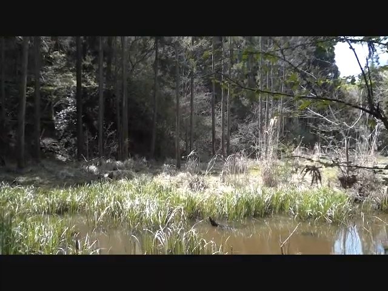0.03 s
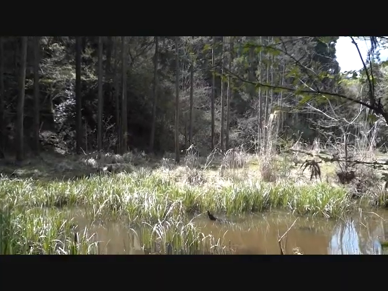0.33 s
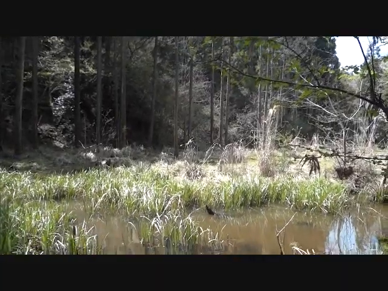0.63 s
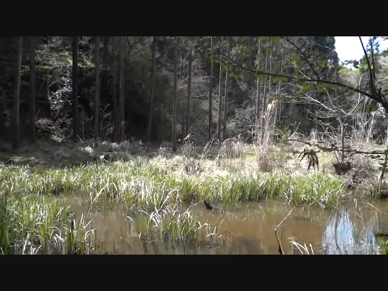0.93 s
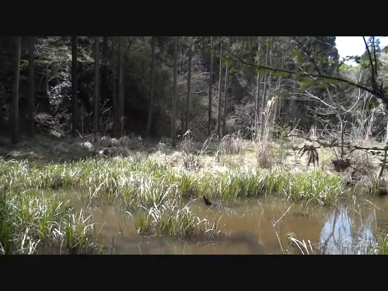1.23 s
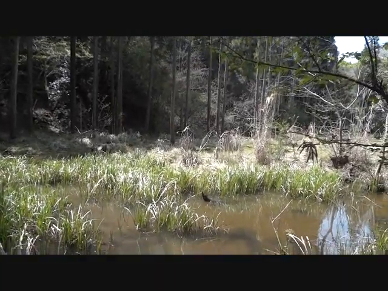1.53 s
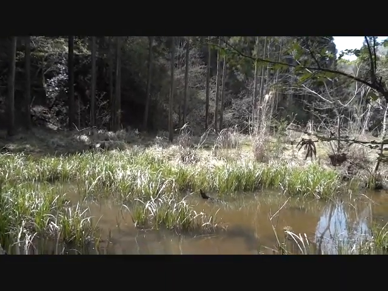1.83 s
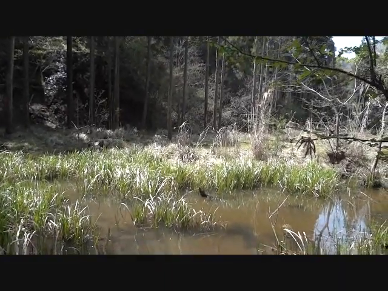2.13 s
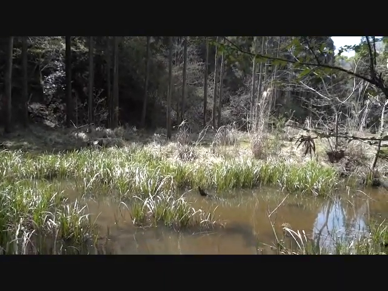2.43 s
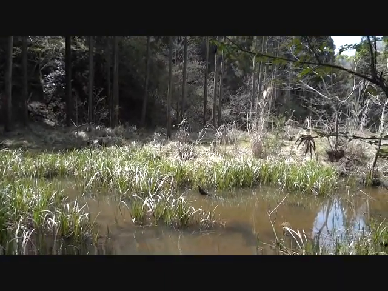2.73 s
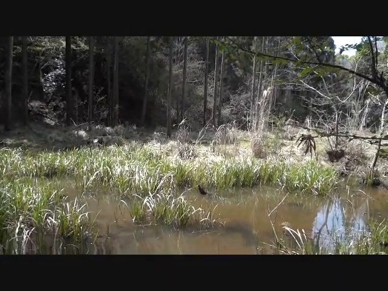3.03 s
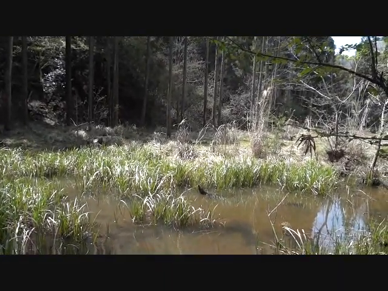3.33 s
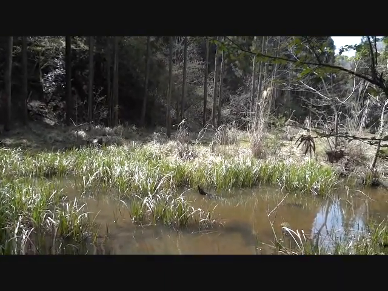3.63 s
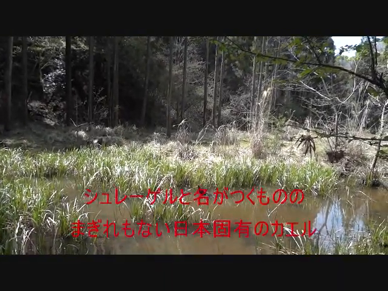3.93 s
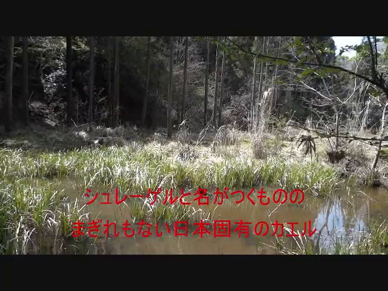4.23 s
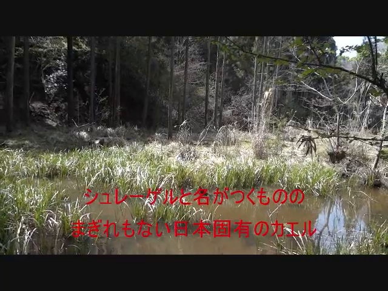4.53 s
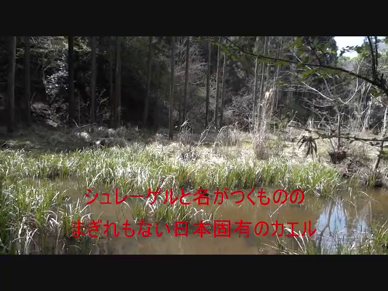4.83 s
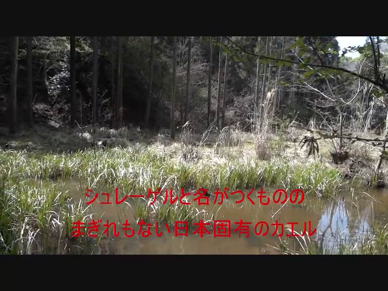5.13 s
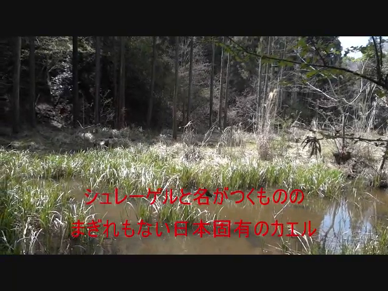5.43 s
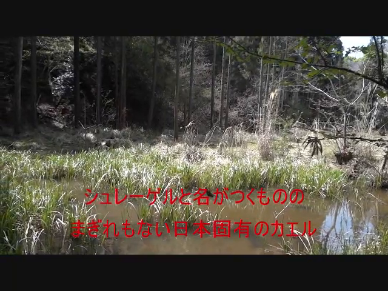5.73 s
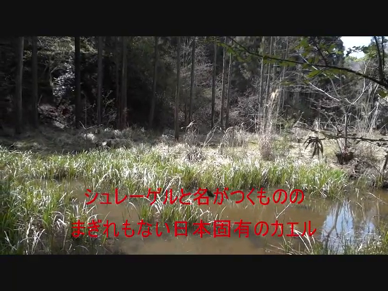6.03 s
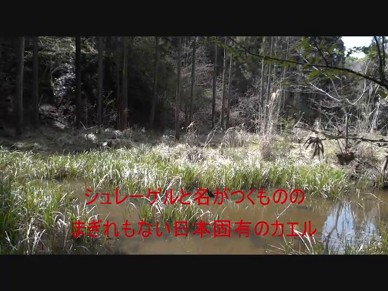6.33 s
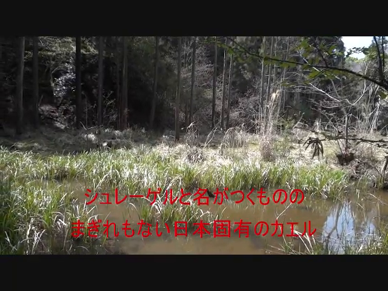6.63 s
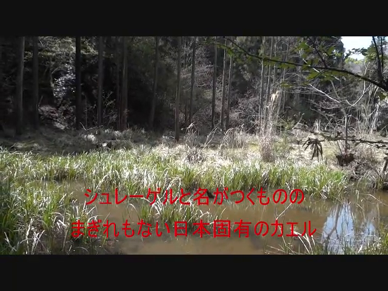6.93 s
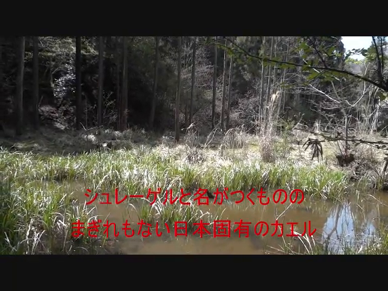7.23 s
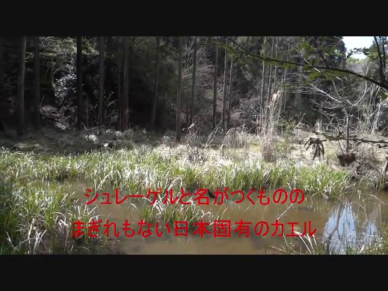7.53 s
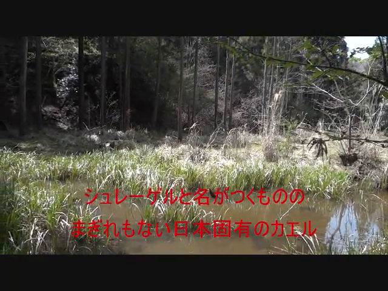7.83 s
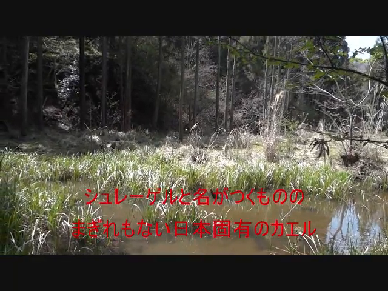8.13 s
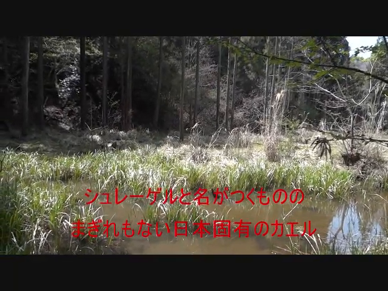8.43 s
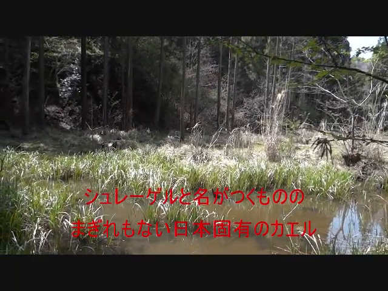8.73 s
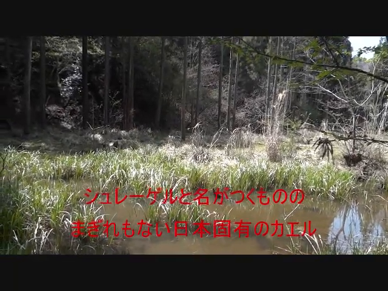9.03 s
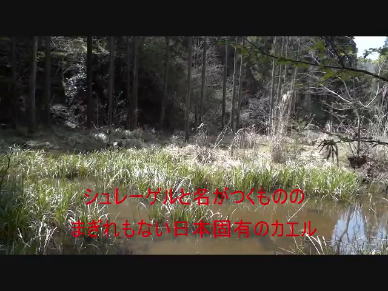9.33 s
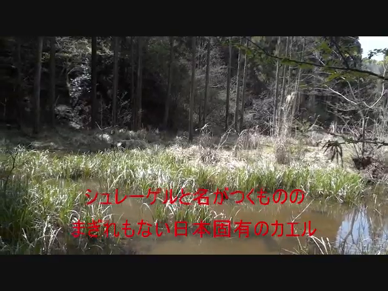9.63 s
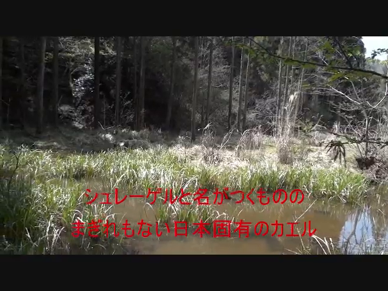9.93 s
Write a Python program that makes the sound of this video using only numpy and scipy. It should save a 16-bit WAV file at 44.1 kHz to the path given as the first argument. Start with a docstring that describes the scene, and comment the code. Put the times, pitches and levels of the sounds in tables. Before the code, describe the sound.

Several frogs trade quick, high, pulsing trills around a pond, some close and some distant, over a soft forest hush.

```python
"""A marshy pond at the edge of a wood, heard from the bank on a camera's stereo microphone.
Tree frogs trill in turns, from close by to far off. Each note is a few quick pulses of the larynx
that ring the vocal sac; reeds and trunks scatter it back. Under them lie one far bird, a few close
ticks and soft forest air, with the camera's own hiss, whine and lens motor right at the microphone."""
import sys
import numpy as np
from scipy import signal
from scipy.fft import rfft, irfft, next_fast_len
from scipy.io import wavfile

SR = 44100
rng = np.random.default_rng(int(sys.argv[2]) if len(sys.argv) > 2 else 0)


def inscribe(sig):
    """Save sig as 16-bit PCM at rate SR to the path in sys.argv[1].

    A 1-D sig is mono; a 2-D sig holds one channel per row.
    Samples are clipped to [-1, 1] before scaling.
    """
    pcm = np.round(np.clip(np.atleast_2d(sig).T, -1, 1) * 32767)
    wavfile.write(sys.argv[1], SR, pcm.astype(np.int16))


N = 440118

# Trills round the pond; a close_gap_ms of 0 means no closing note: start_s, note_count, first_gap_ms,
# slowing_ms (per note), close_gap_ms, level_db (before the frog's trim), swell_db, fade_db, pitch_hz, frog
FROG_TRILLS = [(0.0128, 2, 84.4, 0, 0, -13.5, 0, 1.5, 1985, "near"),
               (1.9648, 7, 79.8, 2.7, 50, -11.2, 12, 1.2, 1975, "near"),
               (6.7472, 4, 73.1, 6.2, 68, -11.8, 18.5, 0, 1994, "near"),
               (8.6308, 5, 83.2, 1.2, 66, -11.2, 11.5, 0, 1964, "near"),
               (0.6794, 6, 78.2, 2.1, 52, -16.8, 5, 1.3, 1862, "hoarse"),
               (3.7497, 5, 73.6, 5.6, 55, -17.5, 5.5, 0, 1880, "hoarse"),
               (1.4059, 5, 56.7, 3.2, 51, -16.2, 12, 2.5, 2045, "clear"),
               (3.8057, 4, 59.1, 4.5, 51, -15.3, 8, 0, 2030, "clear"),
               (5.2340, 4, 57.2, 2.3, 54, -19.3, 10.5, 0, 2040, "clear"),
               (0.5940, 5, 69, 0, 0, -27, 4, 0, 2100, "reeds"),
               (2.8204, 4, 54.8, 5.5, 0, -23, 14, 0, 2070, "reeds"),
               (4.3997, 5, 54.4, 3.4, 41, -25.5, 8, 4.5, 2085, "reeds"),
               (6.1650, 5, 64, 0, 0, -23.3, 7.5, 6.5, 2095, "reeds"),
               (8.0877, 5, 54.6, 4.3, 0, -25.5, 9, 5.5, 2120, "reeds"),
               (2.9078, 16, 46.9, 0.24, 57, -16.2, 12, 7, 1745, "deep"),
               (1.6600, 4, 60, 4, 0, -38, 0, 2, 1760, "deep"),
               (8.1750, 5, 48, 0, 24, -37, 8, 0, 1800, "deep"),
               (0.5544, 5, 33, 5, 48, -23.2, 5.5, 1.5, 2030, "far"),
               (1.4474, 5, 43, 0, 34, -22, 4.5, 1, 2055, "far"),
               (2.9570, 6, 43, 2.2, 48, -20.5, 8, 4.5, 2020, "far"),
               (6.2044, 2, 47, 0, 66, -24, 0, 2, 2050, "far"),
               (7.5657, 5, 38.5, 7.8, 0, -21, 8, 7, 2035, "far"),
               (8.5484, 5, 31, 11, 36, -21.5, 6, 2.5, 2020, "far"),
               (9.4434, 5, 46, 1.5, 31, -21.5, 3, 1.5, 2015, "far"),
               (0.1870, 4, 60.5, 0, 0, -31, 4, 13, 1975, "faint"),
               (0.4930, 1, 0, 0, 0, -38.5, 0, 0, 1920, "faint"),
               (1.7785, 4, 43, 1.5, 0, -34.5, 5, 0, 1880, "faint"),
               (4.2543, 2, 81, 0, 0, -42.5, 1, 0, 1885, "faint"),
               (4.7296, 1, 0, 0, 0, -39, 0, 0, 1937, "faint"),
               (5.8795, 4, 74.5, 2, 0, -35.5, 13, 0, 1945, "faint"),
               (7.2659, 6, 48, 1, 0, -43, 3, 0, 1915, "faint"),
               (9.4017, 1, 0, 0, 0, -41, 0, 0, 1785, "faint")]
# Single clucks of the deep frog: start_s, level_db (before the frog's trim), pitch_hz
DEEP_CLUCKS = [(0.1173, -24.5, 1840), (2.086, -29.5, 1720)]
# Resonances of each frog's throat and sac: pitch_multiple, ring_ms, relative_db
NEAR_MODES = [(1, 2.294, 3.5), (.87, 1.8, -19.5), (1.1, 4.55, -27.5), (.66, 1.6, -27), (2.17, 1.24, -35)]
HOARSE_MODES = [(1.025, 1.62, 21.5), (1.075, 1, 10), (0.29, 1.8, -37), (1.276, 0.67, -24), (6.1, .8, -45)]
CLEAR_MODES = [(1, 2.06, 3.5), (0.864, 0.9, -18), (0.92, 1.5, -7.5), (1.85, 1.1, -29)]
DEEP_MODES = [(1.002, 1.34, 10), (.752, 1.8, 4.5), (1.149, 1.35, 5), (1.31, 0.79, -21.5),
              (1.76, 2.1, -27.5), (2.48, 1.3, -31)]
REEDS_MODES = [(0.97, 2.26, 0), (0.844, 1.8, -13), (1.8, 1.3, -27.5)]
FAR_MODES = [(1, 1.87, 15.5), (0.878, 2.3, -16), (0.84, 4.2, -13), (1.2, 4.9, -11), (1, 1.8, -21),
             (2.1, 1.9, -21.5)]
FAINT_MODES = [(0.988, 2.224, -1.5), (1.136, 2.0, -10.5)]
# Where each frog sits, seen from the microphone: frog, left_minus_right_db
FROG_PAN_DB = dict(near=3.1, hoarse=1.7, clear=3.9, deep=3.3, reeds=1.6, far=1.6, faint=1.2)
# So small a body radiates hardly any bass: frequency_hz, gain_db
BODY_RADIATION = [(700, -44), (1030, -21.5), (1200, 0)]
# Colour of what the reeds scatter back: frequency_hz, gain_db
REED_SCATTER = [(1000, -1), (1270, -3), (1500, -0.5), (1720, 4), (1950, -1.5), (2150, -3.5), (2520, 4.5),
                (2700, -3.5), (3600, 0), (4300, 3.5)]
# Whistles of the far bird: start_s, length_s, from_hz, to_hz, level_db
BIRD_WHISTLES = [(0.197, 0.04, 4570, 4630, -68), (6.07, 0.12, 4420, 4500, -76),
                 (6.791, 0.22, 4250, 4450, -67), (6.957, 0.12, 4400, 4410, -62),
                 (7.77, .09, 4000, 4600, -71)]
# Small dry ticks close by: start_s, level_db, pitch_hz
CLOSE_TICKS = [(3.9977, -48, 5430), (9.4608, -46, 5640), (9.5056, -49, 7700)]
# Spans in which the lens motor runs: start_s, end_s
FOCUS_SPANS = [(0, 2.48), (7.85, 13)]
# Steady tones of the camera's electronics: pitch_hz, level_db
WHINE_TONES = [(13486, -85.5), (6773, -91), (13906, -85)]
# Spectrum of forest air and microphone hiss: frequency_hz, relative_db
AIR_SPECTRUM = [(15, -59), (25, -15.5), (102, -7.5), (148, -7), (211, -7), (361, -4.5), (392, -5),
                (437, -4.5), (620, -3.5), (955, -3.5), (1180, -3.5), (1780, -4), (2660, -6.5), (3130, -9),
                (15800, -17)]
# Stereo width of that hush: frequency_hz, side_minus_mid_db
AIR_SPREAD = [(60, -8), (110, -4.5), (200, 0), (380, 4), (700, 6), (1290, 6), (2380, 1.5), (4400, -2.5),
              (8120, -6), (15000, -22.5)]


def frog(notes, modes, pan_db, gap_ms, pulse_db, trim_db, wet_db, trunks_db, jitter, sag=0.014):
    """One frog on the pond: the larynx fires a few pulses a note into the sac, nearly in step with it."""
    track, t = np.zeros(N), seconds(.04)
    pulse = np.arange(len(pulse_db))
    for start, db, hz in notes:
        timing_draw, size_draw = rng.standard_normal((2, len(pulse)))
        gap_s = np.round(gap_ms * hz / 1000) / hz  # a whole number of the sac's swings
        onsets = gap_s * (pulse + jitter * timing_draw * (pulse > 0))
        sizes = undb(np.array(pulse_db) + size_draw)
        pitches = hz * (1 - sag * (pulse - pulse.mean()))  # the pitch sags as the push fades
        note = sum(size * undb(mode_db) * ring(t - onset, pitch * multiple, ring_ms)
                   for onset, size, pitch in zip(onsets, sizes, pitches)
                   for multiple, ring_ms, mode_db in modes)
        add(track, start, note * undb(db + trim_db) / np.abs(note).max())
    return place(track, pan_db) + place(woods(track, wet_db, trunks_db), pan_db=1.1)


def ring(t, hz, ring_ms):
    """A resonance of the sac swells softly for ring_ms after a pulse and dies away."""
    t = np.maximum(t, 0)
    age = t * 1000 / ring_ms
    swell = (age * np.exp(1 - age)) ** 3
    return swell * np.sin(2 * np.pi * hz * t)


def trills(name, rise_notes, hz_per_db, close_db=-4, close_drop_hz=10, stutter_db=-20, waver=0.004):
    """One frog's notes as start_s, level_db, pitch_hz: trills swell, slow and fade; pitch follows effort."""
    fade_power, scatter_db, stutter_s = 4.5, 0.4, 0.0132
    notes = []
    for start, count, gap_ms, slowing_ms, close_ms, db, swell_db, fade_db, hz, caller in FROG_TRILLS:
        if caller != name:
            continue
        k = np.arange(round(count))
        times = start + (gap_ms * k + slowing_ms * k * (k - 1) / 2) / 1000
        fading = (k / max(k[-1], 1)) ** fade_power  # gives way only near the end
        effort_db = -swell_db * np.exp(-k / rise_notes) - fade_db * fading
        level_draw, pitch_draw = rng.standard_normal((len(k), 2)).T
        pitches = (hz + hz_per_db * effort_db) * (1 + waver * pitch_draw)
        notes += zip(times, db + effort_db + scatter_db * level_draw, pitches)
        if close_ms > 0:  # a lower closing note that stutters out
            close_s = times[-1] + close_ms / 1000
            last_db = db + effort_db[-1] + close_db
            last_hz = pitches[-1] - close_drop_hz
            notes += [(close_s + beat * stutter_s, last_db + beat * stutter_db, last_hz)
                      for beat in range(2)]
    return notes


def chorus(lag_s=.00005):
    """Seven frogs, near to far: the further from the bank, the more of the call comes off the wood."""
    near = trills("near", rise_notes=0.95, hz_per_db=13, close_db=-2.2, close_drop_hz=45, stutter_db=-24)
    hoarse = trills("hoarse", rise_notes=1.5, hz_per_db=10, close_db=-1, close_drop_hz=115,
                    stutter_db=-10, waver=0.01)
    clear = trills("clear", rise_notes=1.6, hz_per_db=10, close_db=-2.8, close_drop_hz=30)
    deep = trills("deep", rise_notes=1.1, hz_per_db=3, close_db=-12, close_drop_hz=20, waver=0.022)
    reeds = trills("reeds", rise_notes=1.3, hz_per_db=9, close_db=-4, close_drop_hz=10, waver=0.01)
    far = trills("far", rise_notes=1.2, hz_per_db=8, close_db=-5.5, close_drop_hz=30, waver=0.016)
    faint = trills("faint", rise_notes=1.7, hz_per_db=4, waver=0.018)
    calls = frog(near, NEAR_MODES, FROG_PAN_DB["near"], gap_ms=3.1, pulse_db=[-1, 0],
                 trim_db=1, wet_db=-7, trunks_db=-16.5, jitter=0.031)
    calls += frog(hoarse, HOARSE_MODES, FROG_PAN_DB["hoarse"], gap_ms=3.4, pulse_db=[-1, 0, -7],
                  trim_db=-1, wet_db=-2, trunks_db=-20, jitter=0.05)
    calls += frog(clear, CLEAR_MODES, FROG_PAN_DB["clear"], gap_ms=3.5, pulse_db=[0, -1],
                  trim_db=-1.5, wet_db=-3, trunks_db=-18.5, jitter=0.018)
    calls += frog(deep + DEEP_CLUCKS, DEEP_MODES, FROG_PAN_DB["deep"], gap_ms=2.45, pulse_db=[0, -2, -8],
                  trim_db=-3.5, wet_db=-6, trunks_db=-14.5, jitter=0.066)
    calls += frog(reeds, REEDS_MODES, FROG_PAN_DB["reeds"], gap_ms=4.6, pulse_db=[-1, 0, -3],
                  trim_db=1.5, wet_db=-1, trunks_db=-15, jitter=0.025)
    calls += frog(far, FAR_MODES, FROG_PAN_DB["far"], gap_ms=4, pulse_db=[0, 0, -4],
                  trim_db=-3, wet_db=5.5, trunks_db=-10.5, jitter=0.08)
    calls += frog(faint, FAINT_MODES, FROG_PAN_DB["faint"], gap_ms=4, pulse_db=[0, -1],
                  trim_db=-.5, wet_db=4.5, trunks_db=-7, jitter=0.049)
    left, right = colour(calls, BODY_RADIATION)
    # the calls reach the left capsule a moment after the right
    t = np.arange(N) / SR
    return np.array([np.interp(t - lag_s, t, left), right])


def woods(x, wet_db, trunks_db=-12, reeds_t60_s=.36, trunks_t60_s=1.17, trunks_hz=2080, side_db=-10):
    """Dense quick scatter from the reeds, then a long, faint, duller tail from the trunks."""
    t = seconds(1.4)
    reeds, trunks = rng.standard_normal((2, 2, len(t)))
    reeds = colour(reeds, REED_SCATTER)
    trunks = signal.sosfilt(signal.butter(N=6, Wn=trunks_hz, fs=SR, output="sos"), trunks)
    reeds_fade, trunks_fade = (np.exp(-np.log(1000) * t / t60) for t60 in (reeds_t60_s, trunks_t60_s))
    build_up = 1 - np.exp(-(t / 0.0049) ** 2)  # the echoes gather over about 5 ms
    mid, side = (reeds * reeds_fade + undb(trunks_db) * trunks * trunks_fade) * build_up
    paths = (mid + undb(side_db) * side * np.array([[1], [-1]])) / np.sqrt(np.sum(mid ** 2))
    return undb(wet_db) * signal.fftconvolve(x[None], paths, axes=1)[:, :N]


def bird():
    """Thin, rising whistles from deep in the wood."""
    track = np.zeros(N)
    for start, length, from_hz, to_hz, db in BIRD_WHISTLES:
        hz = np.linspace(from_hz, to_hz, int(length * SR))
        whistle = np.sin(2 * np.pi * np.cumsum(hz) / SR)
        add(track, start, undb(db) * signal.windows.tukey(len(hz), .4) * whistle)
    return track + woods(track, wet_db=-9)


def ticks(decay_s=0.0059):
    """Tiny dry snaps close to the microphone, each a burst of noise round one pitch."""
    track, t = np.zeros(N), seconds(.03)
    for start, db, hz in CLOSE_TICKS:
        burst = rng.standard_normal(len(t)) * np.exp(-t / decay_s)
        burst = colour(burst, [(hz / 2, -14), (hz, 0), (hz * 1.7, -22)])
        add(track, start, burst * undb(db) / np.abs(burst).max())
    return track + woods(track, wet_db=-8)


def camera(slow_hz=5755, fast_hz=6240, step_s=0.024, steps_per_s=30, motor_db=-69, fast_share=0.19):
    """Right at the microphone, the lens motor sings in short steps as it focuses; the electronics whine."""
    track, t = np.zeros(N), seconds(step_s)
    for start, end in FOCUS_SPANS:
        for when in np.arange(start, end, 1 / steps_per_s):
            speed_draw, size_draw = rng.random(2)
            hz = fast_hz if speed_draw < fast_share else slow_hz
            step = signal.windows.tukey(len(t), .4) * np.sin(2 * np.pi * hz * t)
            add(track, when, step * undb(motor_db - 6 * size_draw ** 2))
    whine = sum(undb(db) * np.sin(2 * np.pi * hz * np.arange(N) / SR) for hz, db in WHINE_TONES)
    return track + whine


def air(mid_db=-62):
    """Forest air and microphone hiss: an even hush, wide in the low middle and centred in the treble."""
    mid, side = (colour(noise, AIR_SPECTRUM) for noise in rng.standard_normal((2, N)))
    spread = colour(side, AIR_SPREAD) * np.array([[1], [-1]])
    return (mid + spread) * undb(mid_db) / mid.std()


def undb(db):
    """Decibels to gain."""
    return 10 ** (np.asarray(db) / 20)


def seconds(length):
    """Time axis of a short sound."""
    return np.arange(int(length * SR)) / SR


def add(track, start_s, sound):
    """Mix a sound into a track from start_s on."""
    i = int(np.clip(start_s * SR, 0, N))
    track[i:i + len(sound)] += sound[:N - i]


def place(x, pan_db):
    """Set a sound between the two capsules; pan_db is left minus right."""
    return x * undb(np.array([[pan_db], [-pan_db]]) / 2)


def colour(x, points):
    """Filter by frequency_hz, gain_db points joined on a log-frequency axis."""
    hz, db = np.transpose(points)
    size = next_fast_len(x.shape[-1], real=True)
    bin_hz = np.maximum(np.fft.rfftfreq(size, 1 / SR), 1)
    gain = undb(np.interp(np.log(bin_hz), np.log(hz), db))
    return irfft(rfft(x, size) * gain, size)[..., :x.shape[-1]]


def scene():
    """The pond as it reaches the microphone on the bank."""
    return chorus() + bird() + ticks() + camera() + air()


def record(dry, top_hz=15850):
    """The camera cuts the highest treble steeply."""
    return signal.sosfilt(signal.ellip(10, .2, 70, top_hz, fs=SR, output="sos"), dry)


dry = scene()
out = record(dry)
inscribe(out)
```